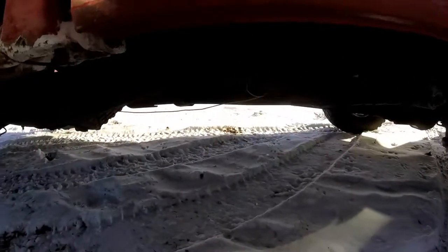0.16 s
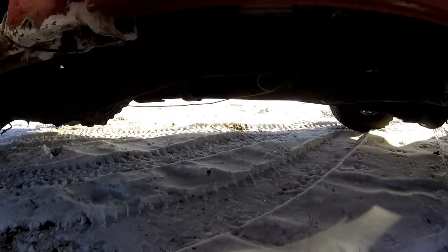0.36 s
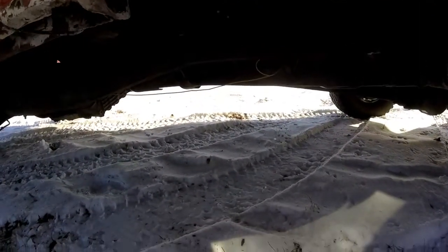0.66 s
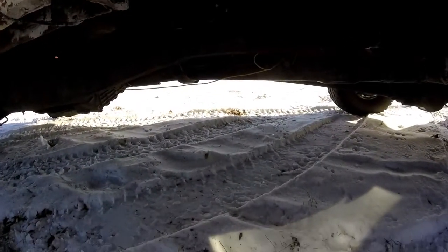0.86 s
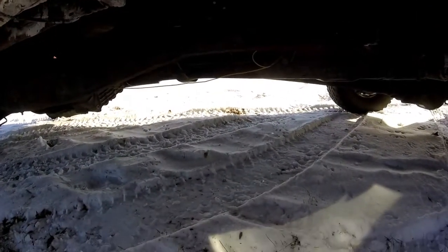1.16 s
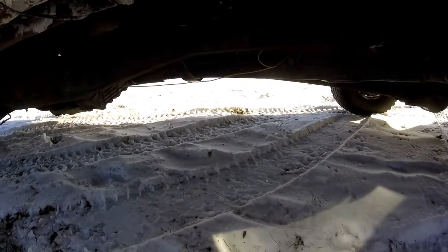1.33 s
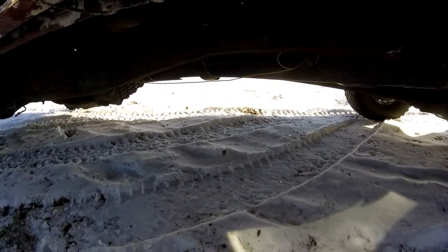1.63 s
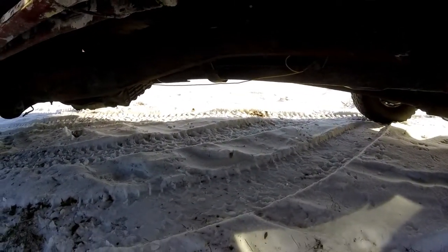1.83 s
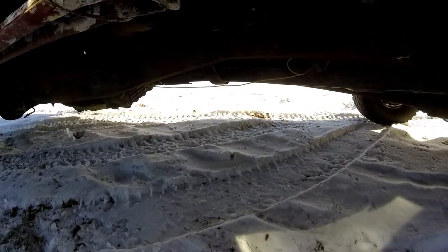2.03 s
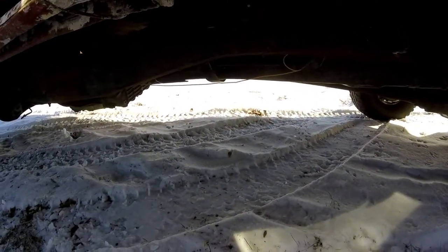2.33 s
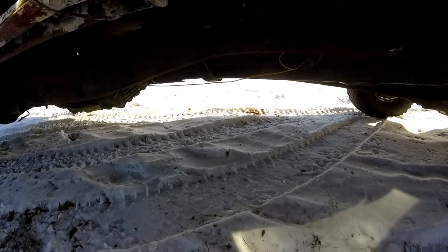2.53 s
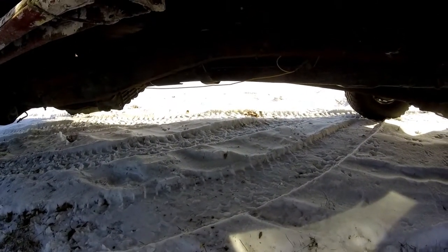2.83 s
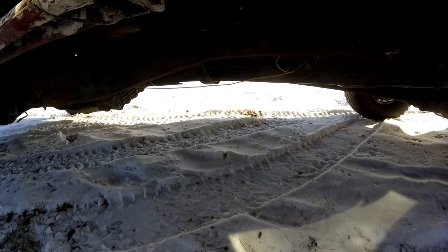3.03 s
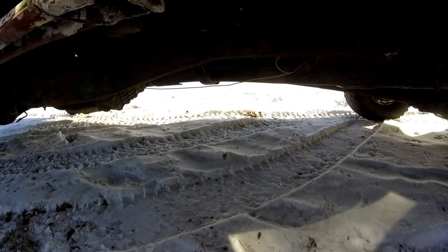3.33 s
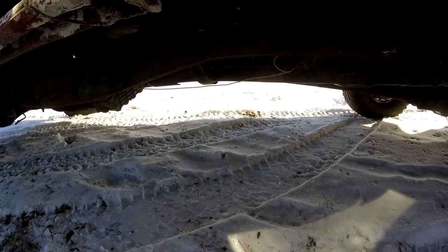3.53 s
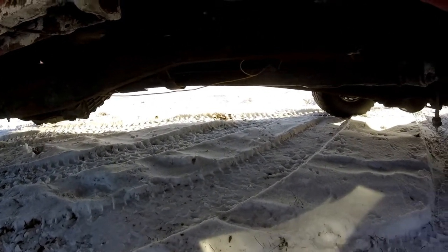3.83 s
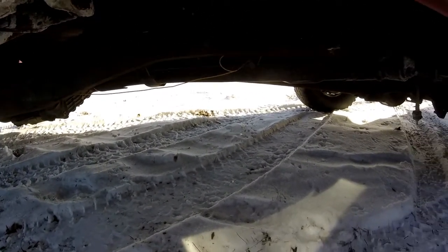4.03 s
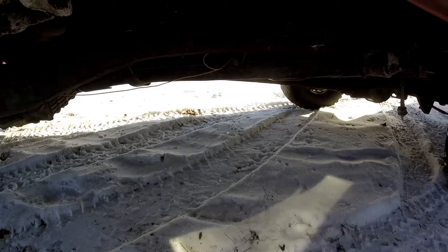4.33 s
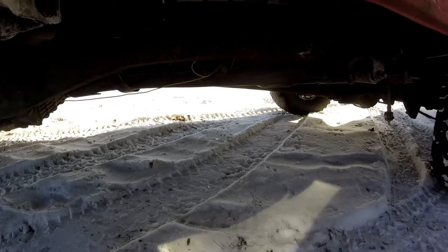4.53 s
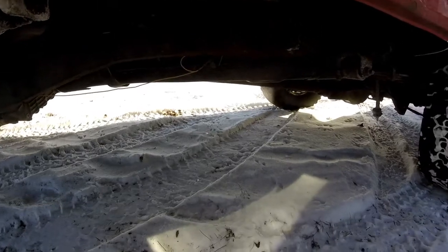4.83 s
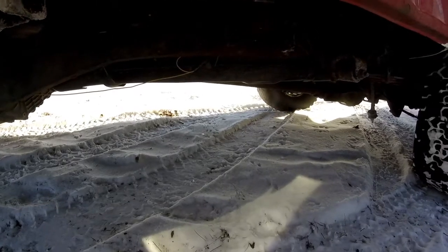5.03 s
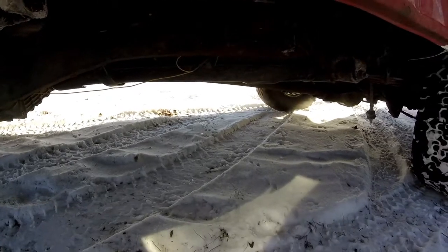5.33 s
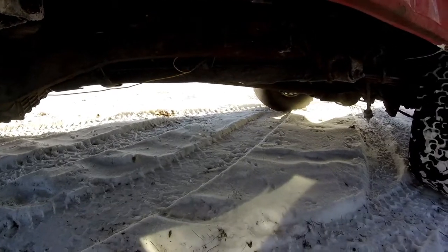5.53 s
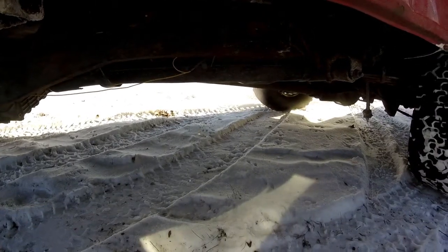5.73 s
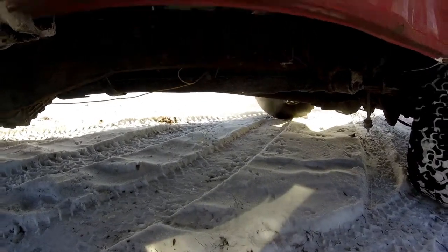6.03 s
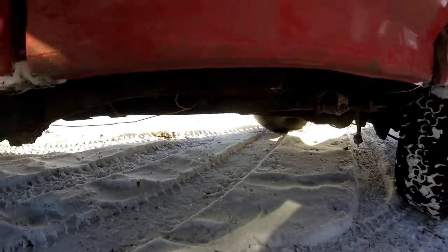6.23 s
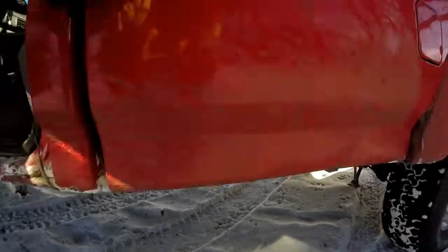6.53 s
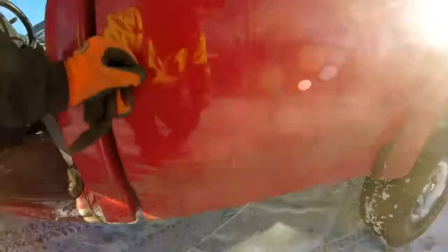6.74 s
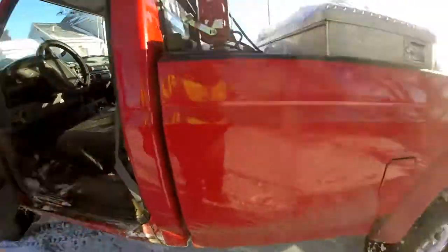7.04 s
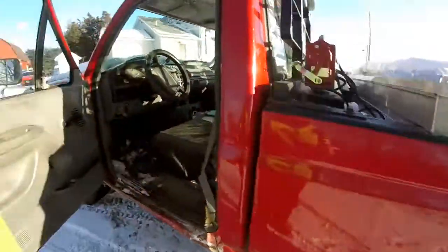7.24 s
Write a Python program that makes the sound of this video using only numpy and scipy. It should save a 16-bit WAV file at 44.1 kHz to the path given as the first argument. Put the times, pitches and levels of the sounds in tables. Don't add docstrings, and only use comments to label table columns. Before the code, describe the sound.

A loud truck engine with open exhaust settles from a fast, booming idle to a steady rough throb, with hiss, clatter, whines and snow creaks.

```python
import sys
import numpy as np
from scipy import signal
from scipy.fft import rfft, irfft
from scipy.io import wavfile
from scipy.ndimage import uniform_filter1d

SR = 44100
rng = np.random.default_rng(int(sys.argv[2]) if len(sys.argv) > 2 else 0)


def persist_wave(psi):
    counts = np.round(np.clip(psi, -1, 1) * 32767).astype(np.int16)
    wavfile.write(sys.argv[1], SR, np.atleast_2d(counts).T)


def convert_level_to_amplitude(level_db):
    exponent = np.asarray(level_db, float) / 20
    return 10 ** exponent


N = 325261

# (time [s], speed [rpm])
ENGINE_SPEED = [(0.0, 1405.2), (0.45, 1399.6), (0.9, 1402.8), (1.3, 1379.8), (2.1, 1331.9), (2.9, 1293.9),
                (3.2, 1294.0), (3.9, 1296.4), (4.85, 1301.6), (5.35, 1296.7), (6.0, 1302.7), (6.85, 1292.8),
                (7.38, 1293.2)]
# (pitch [Hz], width [Hz], level [dB], polarity at the microphone [+1 or -1])
LEFT_PIPE = [(54.6, 14.0, -31.1, -1.0), (75.2, 26.1, -39.5, -1.0), (116.5, 37.5, -21.9, 1.0),
             (141.6, 51.2, -22.9, -1.0), (168.6, 28.9, -27.2, 1.0), (277.1, 25.7, -30.1, 1.0),
             (293.4, 30.5, -27.3, -1.0), (305.4, 13.9, -28.1, 1.0), (443.9, 20.1, -39.9, -1.0),
             (476.1, 21.6, -39.2, 1.0), (655.4, 194.2, -53.3, 1.0), (727.5, 14.2, -46.9, 1.0),
             (807.7, 20.2, -52.2, -1.0), (877.7, 64.5, -54.2, -1.0)]
RIGHT_PIPE = [(55.9, 21.2, -32.7, -1.0), (82.5, 13.9, -28.1, 1.0), (142.8, 20.8, -23.4, -1.0),
              (158.8, 197.1, -42.6, 1.0), (178.2, 13.9, -28.5, 1.0), (245.1, 89.6, -35.7, -1.0),
              (245.6, 35.1, -34.3, 1.0), (308.5, 90.6, -49.3, 1.0), (433.1, 13.9, -48.9, 1.0),
              (479.7, 13.9, -37.6, 1.0), (569.5, 13.9, -50.9, 1.0), (801.1, 26.1, -51.8, 1.0),
              (844.5, 22.3, -51.9, 1.0), (861.7, 17.7, -60.5, -1.0)]
# (strength [dB], extra delay in the pipe [ms])
CYLINDERS = [(-0.3, 0.22), (0.6, 0.36), (-1.0, -0.29), (0.6, 0.25), (2.0, -0.23), (0.6, -0.29), (1.6, 0.35),
             (-0.2, -0.35)]
LEFT_BANK = [0, 3, 5, 6]
GROUP_HZ = [200, 380, 550]
# (settled [dB], then the change at fast idle [dB], while the throttle shuts [dB],
# beside the sill [dB], once lifted clear [dB])
GROUP_LEVELS = [
    (1.5, 4, -0.8, 0.1, -1.5),
    (1.5, 1.74, -2, -7.5, -3.5),
    (3, 5.5, -7, -6.5, -6),
    (-1.74, 8.5, -2, 0.5, -7),
]
# (pitch [Hz], level per Hz [dB])
CLATTER_COLOUR = [(530, -32.5), (900, -1.5), (1120, -21), (1180, -13.5), (1420, -19), (1630, -18),
                  (2010, -14.5), (2110, -15.5), (2390, -26), (2700, -29.5), (3590, -30), (4360, -40),
                  (5000, -43.5), (6500, -61.5), (11000, -120)]
# (pitch [Hz], level per Hz [dB])
HISS_COLOUR = [(1760, -29.5), (3000, -6), (4380, -6), (4960, -8), (5420, -1.5), (5890, -7.5), (6530, -5.5),
               (8610, -11.5), (10700, -16), (15600, -44.5)]
# (pitch [Hz], level [dB])
BUZZ_COLOUR = [(3600, -21), (4900, -7.5), (5400, -8.5), (5950, -1.5), (6500, -7), (7400, -20), (8600, -31),
               (10400, -21.5), (12500, -24), (15500, -40)]
# (time [s], length [s], centre pitch [Hz], width [Hz], level [dB])
CREAKS = [(0.022, 0.037, 6000, 4000, -47.5), (0.078, 0.021, 6500, 8000, -47),
          (0.17, 0.012, 8500, 5960, -53), (0.34, 0.012, 6500, 6000, -54.5),
          (0.556, 0.011, 5880, 6000, -51.5), (3.17, 0.032, 6000, 302, -51),
          (3.169, 0.22, 7000, 3480, -57.5), (3.343, 0.032, 11300, 150, -59.5),
          (4.136, 0.053, 8100, 2880, -63.5), (4.988, 0.13, 7900, 2480, -57.5),
          (5.014, 0.016, 3870, 1800, -51), (5.029, 0.063, 1960, 503, -44.5),
          (5.052, 0.034, 3630, 2190, -51), (6.242, 0.034, 6500, 3500, -53), (6.434, 0.023, 5000, 4900, -68),
          (6.568, 0.074, 7100, 5900, -61.5), (6.668, 0.074, 6500, 6000, -59.5),
          (6.767, 0.026, 6000, 6030, -59), (7.008, 0.0079, 8100, 6000, -65)]
# (time [s], length [s], first pitch [Hz], last pitch [Hz], level [dB])
SQUEAKS = [
    (4.11, .08, 1600, 1200, -40),
    (4.79, .12, 2080, 2580, -45),
    (5.24, .07, 2250, 1950, -49),
    (4.62, .07, 2300, 1950, -51),
]
# (from [s], to [s])
BELT_SPELLS = [
    (1.75, 2.8),
    (4.3, 6.35),
]

WARM_S = .4
TIME = np.arange(-int(WARM_S * SR), N) / SR
SETTLED_RPM, FAST_RPM = 1300, 1400
START_CYCLE = .0022
SHUT_S, SHUT_WIDTH_S = 2.03, 0.32
TURN_S = 0.94
SWING_S, STEADY_SWING = 6.2, 0.23
LIFT_FROM_S, SILL_S, SILL_WIDTH_S = 6.1, 7.03, 0.12
LIFT_BASS_LOSS = .4
HISS_DB, HISS_FAST_DB, HISS_TURN_DB, HISS_LIFT_DB = -59, 2, 4, 3
BELT_DB, BELT_SPELL_DB, RISE_S = -58.5, 6.5, .25
PUMP_DB, PUMP_FROM_S, PUMP_TO_S = -53, 2.8, 4.3
MOTOR_DB, MOTOR_LINE_HZ, MOTOR_SAG_HZ_PER_S = -60.5, 6060, .3
MOTOR_MULTIPLE = 33
SECOND_RATIO, SECOND_STOP_S = .9885, 2.5
HUNT_HZ, HUNT_PERIOD_S, HUNT_PEAK_S = 13, .398, .13
BLAST_CYCLE, BLAST_FROM_RPM = .79, 1365
BLAST_BOOM_DB, BLAST_CRACK_DB, BLAST_MASK_DB = -20.5, -40.5, -6


def ring(x, hz, width):
    return signal.lfilter(*signal.iirpeak(hz, hz / width, SR), x)


def clicks(times, sizes):
    at = np.clip((times - TIME[0]) * SR, 0, len(TIME) - 2)
    i = at.astype(int)
    early = np.bincount(i, sizes * (1 + i - at), len(TIME))
    late = np.bincount(i + 1, sizes * (at - i), len(TIME))
    return early + late


def noise(colour):
    hz, db = np.transpose(colour)
    f = np.fft.rfftfreq(len(TIME), 1 / SR) + 1
    gain = convert_level_to_amplitude(np.interp(np.log(f), np.log(hz), db, -120, -120))
    x = irfft(rfft(rng.standard_normal(len(TIME))) * gain, len(TIME))
    return x / x.std()


def walk(rate_hz):
    k = int(SR / rate_hz)
    x = uniform_filter1d(uniform_filter1d(rng.standard_normal(len(TIME)), k), k)
    return x / x.std()


def ramp(start_s, length_s):
    return np.clip((TIME - start_s) / length_s, 0, 1)


def bump(at_s, width_s):
    return np.exp(-.5 * ((TIME - at_s) / width_s) ** 2)


def snow_creaks():
    sizes = convert_level_to_amplitude(2.5 * rng.exponential(size=len(TIME)))
    breaks = rng.random(len(TIME)) < .12
    grains = rng.standard_normal(len(TIME)) * sizes * breaks
    out = np.zeros(len(TIME))
    for s, length, hz, width, db in CREAKS:
        i, n = int((s - TIME[0]) * SR), int(length * SR) + 8
        burst = ring(ring(grains[i:i + n], hz, width), hz, width)
        out[i:i + n] += convert_level_to_amplitude(db) * np.linspace(1.3, 0, n) ** 0.33 * burst / burst.std()
    return out


def sole_squeaks():
    out = np.zeros(len(TIME))
    for s, length, from_hz, to_hz, db in SQUEAKS:
        i, n = int((s - TIME[0]) * SR), int(length * SR)
        glide_hz = np.linspace(from_hz, to_hz, n) + 90 * walk(200)[:n]
        phase = 2 * np.pi * np.cumsum(glide_hz) / SR
        out[i:i + n] += convert_level_to_amplitude(db) * np.hanning(n) ** .4 * .8 * np.sin(phase)
    return out


def belt_and_pump(cycle):
    spells = sum(ramp(a, RISE_S) - ramp(b, RISE_S) for a, b in BELT_SPELLS)
    belt = convert_level_to_amplitude(BELT_DB + BELT_SPELL_DB * spells) * np.sin(2 * np.pi * 166.5 * cycle)
    pump_db = PUMP_DB + 2.5 * walk(9) - 8.6 * ramp(PUMP_TO_S, RISE_S)
    pump = convert_level_to_amplitude(pump_db) * ramp(PUMP_FROM_S, RISE_S) * np.sin(2 * np.pi * 190.2 * cycle)
    return belt + pump


def motor(line_hz, db, shake):
    turn = 2 * np.pi * np.cumsum(line_hz / MOTOR_MULTIPLE) / SR
    hz, colour_db = np.transpose(BUZZ_COLOUR)
    out = 0
    for k in range(20, 85):
        slow = np.interp(TIME, np.linspace(0, TIME[-1], 12), rng.standard_normal(12))
        quick = np.interp(TIME, np.linspace(0, TIME[-1], 90), rng.standard_normal(90))
        tone_db = np.interp(k * line_hz.mean() / MOTOR_MULTIPLE, hz, colour_db)
        tone_db = tone_db + 3 * slow + shake * (4 - 11 * abs(quick))
        out = out + convert_level_to_amplitude(tone_db) * np.cos(k * turn + rng.normal(0, 1.6))
    return np.sqrt(2) * out * convert_level_to_amplitude(db)


def motor_pair(turn):
    swing = STEADY_SWING + 0.48 * (1 - ramp(0, SECOND_STOP_S)) + (1 - STEADY_SWING) * ramp(SWING_S, .1)
    db = MOTOR_DB + 1.2 * swing + 1.8 * turn
    running = 1 - ramp(SECOND_STOP_S - .04, .04)
    hunt = HUNT_HZ * np.cos(2 * np.pi * (TIME - HUNT_PEAK_S) / HUNT_PERIOD_S)
    line_hz = MOTOR_LINE_HZ - MOTOR_SAG_HZ_PER_S * TIME + running * (8 + hunt)
    return motor(line_hz, db, swing) + running * motor(line_hz * SECOND_RATIO, db - 1.5, swing)


def gas_hiss(fast, turn, puffs):
    db = HISS_DB + HISS_FAST_DB * fast + HISS_TURN_DB * turn + HISS_LIFT_DB * bump(6.65, 0.23)
    return convert_level_to_amplitude(db + 0.64 * walk(12)) * (1.1 + 0.17 * puffs) * noise(HISS_COLOUR)


def valve_tick(cycle):
    n = np.arange(int(cycle[0]), int(cycle[-1]))
    ticks = 0
    for at, db in ((.86, 0), (.99, -5)):
        sizes = convert_level_to_amplitude(db + 3.5 * rng.standard_normal(len(n)))
        ticks = ticks + clicks(np.interp(n + at, cycle, TIME), sizes)
    return convert_level_to_amplitude(-9) * (ring(ticks, 3750, 81) + 1.1 * ring(ticks, 1700, 70))


def engine_clatter(load_db, puffs):
    db = -40.5 + 0.63 * load_db
    return convert_level_to_amplitude(db + 0.94 * walk(46)) * (0.81 + 0.17 * puffs) * noise(CLATTER_COLOUR)


def joint_blast(cycle, loaded):
    n = np.arange(int(cycle[0]), int(cycle[-1]))
    sizes = convert_level_to_amplitude(.8 * rng.standard_normal(len(n)))
    pulses = clicks(np.interp(n + BLAST_CYCLE, cycle, TIME), sizes)
    boom = ring(ring(pulses, 474, 6) + .08 * ring(pulses, 435, 30), 458, 55)
    crack = ring(ring(pulses, 800, 110), 760, 240)
    return loaded * (convert_level_to_amplitude(BLAST_BOOM_DB) * boom / boom.std() + convert_level_to_amplitude(BLAST_CRACK_DB) * crack / crack.std())


def exhaust(cycle, cycle_hz, group_db):
    n = np.arange(int(cycle[0]) * 8, int(cycle[-1]) * 8 + 8)
    strength_db, delay_ms = np.array(CYLINDERS)[n % 8].T
    time_chance, size_chance = rng.standard_normal((2, len(n)))
    times = np.interp(n / 8, cycle, TIME) + (delay_ms + .04 * time_chance) / 1000
    sizes = convert_level_to_amplitude(strength_db + 0.72 * size_chance)
    left = np.isin(n % 8, LEFT_BANK)
    swirl_colour = [(25, -2), (45, -5.0), (100, -29.5), (180, -33),
                    (300, -15), (480, -4.5), (800, 10.5), (1100, 14.5)]
    out, puffs = 0, 0
    for pipe, mine in ((LEFT_PIPE, left), (RIGHT_PIPE, ~left)):
        pulses = clicks(times[mine], sizes[mine])
        puff = signal.lfilter([1], [1, -np.exp(-1 / (0.0059 * SR))], pulses)
        drive = pulses * SR / (2 * cycle_hz) + convert_level_to_amplitude(20) * (1.18 + puff) * noise(swirl_colour)
        for hz, width, db, polarity in pipe:
            level = convert_level_to_amplitude(db + group_db[np.searchsorted(GROUP_HZ, hz)])
            out = out + polarity * level * ring(drive, hz, width)
        puffs = puffs + puff
    for hz, width, db in ((180, 30, -10), (345, 60, -4), (572, 14, -3)):
        hollow = convert_level_to_amplitude(db) * ring(out, hz, width)
        if hz == 180:
            first, total = out, out + hollow
        else:
            total = total + convert_level_to_amplitude(db) * ring(first, hz, width)
    smooth = signal.butter(5, 980, fs=SR, output="sos")
    return signal.sosfiltfilt(smooth, total * convert_level_to_amplitude(-1.7)), puffs / puffs.mean()


def scene():
    rpm = np.interp(TIME, *np.transpose(ENGINE_SPEED))
    cycle_hz = rpm / 120
    cycle = np.cumsum(cycle_hz) / SR
    cycle += START_CYCLE - cycle[int(WARM_S * SR)]
    fast = np.clip((rpm - SETTLED_RPM) / (FAST_RPM - SETTLED_RPM), 0, 1)
    loaded = np.clip((rpm - BLAST_FROM_RPM) / 30, 0, 1)
    turn = 1 - ramp(0, TURN_S)
    lift = ramp(LIFT_FROM_S, TIME[-1] - LIFT_FROM_S) ** 1.2
    shutting, beside_sill = bump(SHUT_S, SHUT_WIDTH_S), bump(SILL_S, SILL_WIDTH_S)
    group_db = np.array(GROUP_LEVELS) @ [np.ones(len(TIME)), fast, shutting, beside_sill, lift]
    group_db[2] += BLAST_MASK_DB * loaded
    pipes, puffs = exhaust(cycle, cycle_hz, group_db)
    pipes = pipes + joint_blast(cycle, loaded)
    pipes = pipes - LIFT_BASS_LOSS * ramp(7.5, 0.48) * ring(pipes, 120, 50)
    ticks = valve_tick(cycle) * convert_level_to_amplitude(group_db[3] - 4.0)
    engine = pipes + engine_clatter(group_db[3], puffs) + ticks + gas_hiss(fast, turn, puffs)
    mix = engine + motor_pair(turn) + belt_and_pump(cycle) + sole_squeaks() + snow_creaks()
    return mix[None, -N:]


def roll_off(x):
    return signal.sosfilt(signal.butter(12, 15710, fs=SR, output="sos"), x)


def record(dry):
    mix = np.tanh(0.86 * dry) / 0.76
    return roll_off(mix)


dry = scene()
out = record(dry)
persist_wave(out)
```